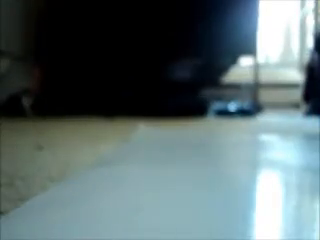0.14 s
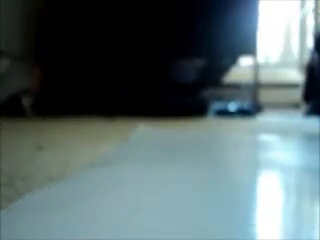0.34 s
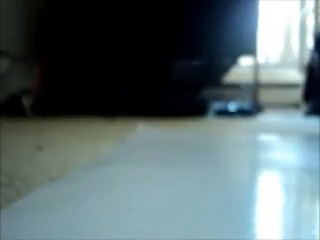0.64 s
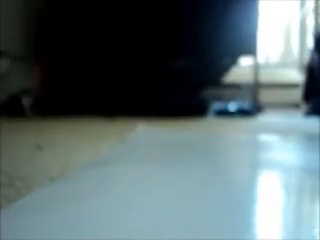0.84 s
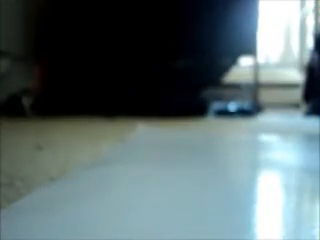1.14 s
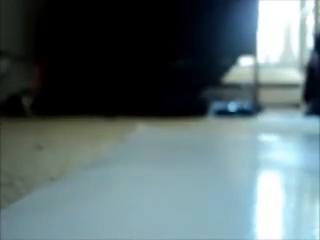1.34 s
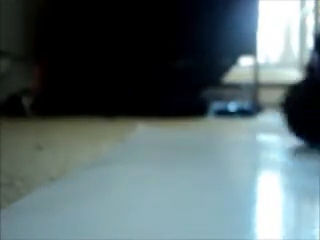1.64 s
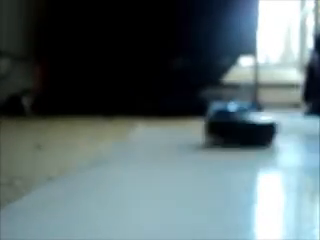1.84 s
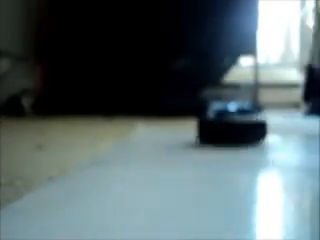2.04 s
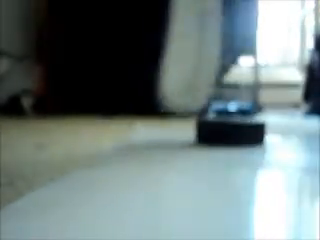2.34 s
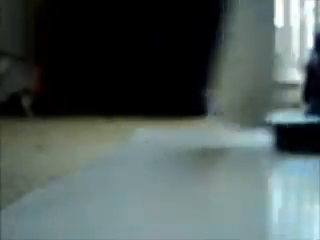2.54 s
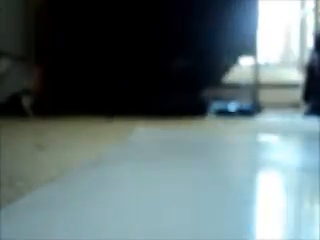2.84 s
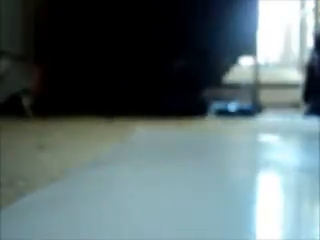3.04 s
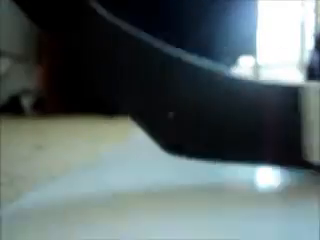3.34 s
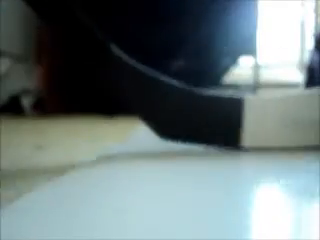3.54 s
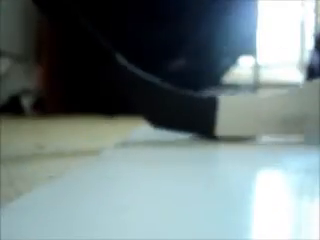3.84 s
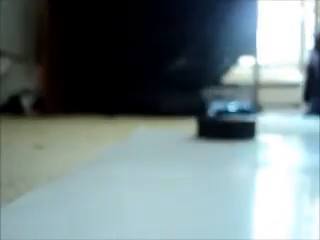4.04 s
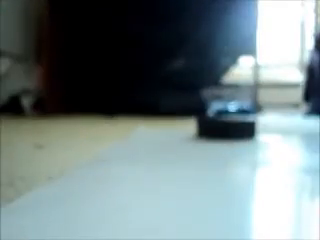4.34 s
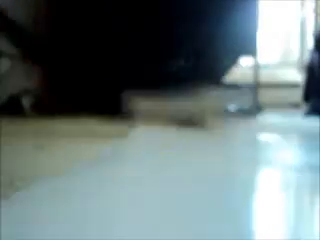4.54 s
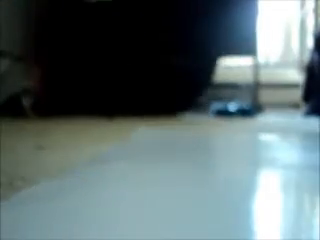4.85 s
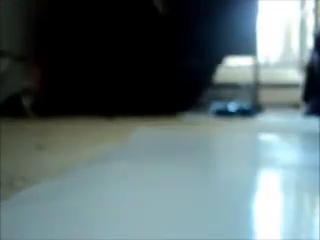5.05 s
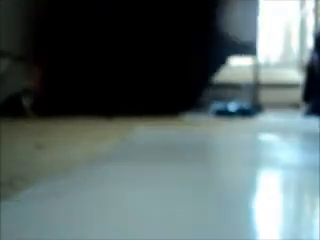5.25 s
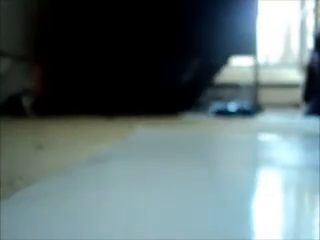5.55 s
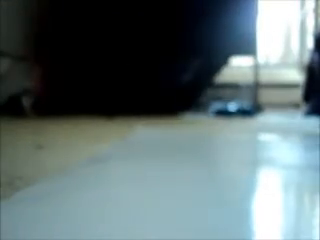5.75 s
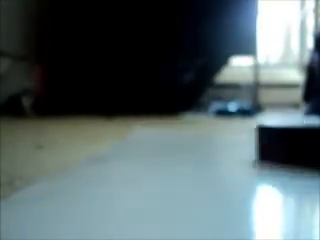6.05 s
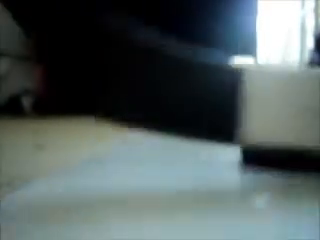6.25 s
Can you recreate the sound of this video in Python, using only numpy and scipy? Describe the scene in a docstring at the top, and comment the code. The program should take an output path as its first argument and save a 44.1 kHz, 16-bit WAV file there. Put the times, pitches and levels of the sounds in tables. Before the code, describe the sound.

Stick clacks and dull thuds on a hard sheet, a puck rocking flat, short slides, then one clipping shot crack and quieter aftermath in a small room.

```python
"""Hockey practice in a small room: impacts are short force pulses that excite decaying modes and echoes.
The room noise first swells as the gain recovers; stick clacks and thuds follow, a puck hops in and falls over.
It rocks flat in quickening double knocks, then thuds, clacks and slides (filtered noise) lead to one hard shot.
The shot overloads the recorder: the gain sinks, a faint ping (one decaying sine) sounds, the room noise starts
to swell in again, a small pop is heard, and after another clack and more slides the next puck is stopped."""
import sys
import numpy as np
from scipy import signal
from scipy.fft import rfft, irfft, next_fast_len
from scipy.io import wavfile

SR = 44100
rng = np.random.default_rng(int(sys.argv[2]) if len(sys.argv) > 2 else 0)


def transcribe(signal):
    """Save signal, clipped to [-1, 1], as a 16-bit WAV file at the path in sys.argv[1]."""
    frames = np.atleast_2d(signal).T
    limited = np.clip(frames, -1, 1)
    pcm = np.round(limited * 32767).astype(np.int16)
    wavfile.write(sys.argv[1], SR, pcm)


N = 282681
TIME = np.arange(N) / SR
RING = TIME[:SR // 2]  # time axis of one blow, half a second

# Clacks that ring the stick's blade; the row with by far the highest peak is the shot, right by the microphone,
# and the blade's clatter follows it. Each row: middle of the contact in seconds, peak of its push in dB,
# time from middle to peak in ms, then grit, blade ring and room response in dB relative to the clack.
STICK_CLACKS = [(0.2185, -13, 0.23, -20.5, -2, 1.5), (0.2697, -31, 0.2, -15, 13, 15),
                (0.582, -15, 0.24, -22, -4.5, -1), (1.3878, -11.5, 0.19, -11, -0.5, -0.5),
                (1.8652, -17.5, 0.28, -19.5, -8, -4.5), (2.903, -5, 0.2, -25, -40, -2),
                (4.5688, 15, 0.16, -42.5, -23, -21), (4.5793, -10, 0.32, -21.5, -11.5, 1.5),
                (4.5891, -22, .16, 1, -7.5, 0.5), (4.596, -15, 0.16, -22, -12, -1),
                (5.7615, -22, 0.28, -18, -18, 3)]
# Puck or blade landing flat on the sheet: stick work further off, the puck falling over, the blade pushing it off
# and coming down, a new puck laid out, and the next puck stopped. Each row: middle of the contact in seconds,
# peak of its push in dB, grit and sheet ring in dB relative to the thud, frequency the spot favours in Hz.
FLAT_THUDS = [ (0.3375, -16.5, -9, 3.5, 354), (0.3577, -26.5, -2, 12, 340), (.412, -21.5, -10.5, 4, 324),
              (0.5061, -37, -10, 4, 320), (0.8588, -21.5, -12, 9.5, 345), (0.9797, -25.5, -11, 9.5, 198),
              (1.895, -17, -17, 13, 190), (1.8998, -22.5, -5, -18, 200), (2.4358, -29, -16, -6, 230),
              (2.439, -27, -15, 22.5, 235), (3.085, -27.5, -19, -2, 355), (3.3332, -7.5, -28.5, 7.5, 360),
              (3.9724, -25, -12.5, 9.5, 350), (4.0122, -29.5, -16, -14, 400), (6.2946, -8.5, -25.5, 5, 330),
              (6.3121, -21, -21, 8.5, 137)]
# The puck hopping in on its edge. Each row: middle of the contact in seconds, peak of its push in dB
# before the rim's bass loss.
PUCK_HOPS = [(1.547, -32.5), (1.593, -32.5), (1.8074, -31)]
# Slides over the sheet. Each row: start in seconds, length in seconds, rumble and hiss in dB (rms at full speed,
# before the roughness), hiss centre in Hz.
SHEET_SLIDES = [(2.466, 0.27, -54, -61, 4670), (3.36, 0.73, -51.5, -56.5, 960),
                (4.025, 0.24, -59, -48.5, 990), (4.538, 0.11, -54, -75, 3020),
                (5.789, 0.32, -85, -52, 3070), (5.72, 0.59, -48, -59.5, 4570), (6.301, 0.2, -49, -63, 4500)]
# Modes of the blade. Each row: mean frequency in Hz, relative level in dB, 60 dB decay time in seconds.
BLADE_MODES = [(762, -5, 0.047), (910, -25, 0.52), (1032, -10, .08), (1202, -22.5, 0.09), (2620, -11, 0.15),
               (2870, 6, .04)]
# Modes of the sheet on the floor. Each row: mean frequency in Hz, relative level in dB before the weighting by
# the struck spot, 60 dB decay time in seconds.
SHEET_MODES = [(135, -12.5, 0.1), (196, -10, 0.14), (235, -8.5, 0.071), (355, -12, 0.07),
               (427, -7.5, 0.033), (537, -4, 0.028)]
# A faint ping after the shot. Its values: start in seconds, level in dB, mean frequency in Hz,
# 60 dB decay time in seconds.
FAINT_PING = (5.018, -32.5, 997, 0.05)
# Early echoes from things close by. Each row: mean delay in ms, gain relative to the room response.
NEAR_ECHOES = [(1.0, 0.19), (3.9, 0.082), (4.9, 0.085), (7.4, 0.089)]
# Spectrum of the room's scatter and tail. Each row: frequency in Hz, relative density in dB.
ROOM_SPECTRUM = [(60, -10), (140, 2.5), (200, 6.5), (450, 0.5), (700, -1.5), (1050, 3.5), (1450, -3),
                 (2100, -4.5), (2700, 7), (3400, 1.5), (5500, -5)]
# Spectrum of crushed dirt and fine friction. Each row: frequency in Hz, relative density in dB.
GRIT_SPECTRUM = [(300, -11.5), (1200, 8.5), (2200, -8), (2900, 1), (3800, -5.5), (5000, 1.5), (6000, -14)]
# Spectrum of the rumble under a slide. Each row: frequency in Hz, relative density in dB.
RUB_SPECTRUM = [(60, -4), (250, 2.5), (600, 4), (1100, 1.5), (1600, -10.5), (2400, -21), (5500, -25.5)]
# Spectrum of the steady background. Each row: frequency in Hz, relative density in dB.
AMBIENCE_SPECTRUM = [(15, -41), (25, -9), (33, -1.5), (70, -0.5), (144, -2), (317, -4), (372, -5),
                     (545, -7), (596, -8.5), (652, -8.5), (1120, -10.5), (1500, -14.5), (4310, -20.5),
                     (5050, -19.5), (5400, -29), (7020, -60.5), (11900, -120)]

LEAD_S = 0.004  # a contact starts to build up this long before its middle
MIDDLING_DB = -20  # a blow of middling strength, the reference for the thuds
# A middling thud: its width shrinks with force by a power law; its room level lags, as louder thuds are nearer.
THUD_WIDTH_MS, THUD_STIFFENING, THUD_ROOM_DB, THUD_ROOM_LAG = 0.32, 0.05, -1.5, 0.39
# The puck's rim gives one dead knock and radiates little bass.
RIM_HZ, RIM_T60_S, RIM_LOW_HZ = 487, 0.0058, 254
HOP_WIDTH_MS, HOP_GRIT_DB, HOP_RING_DB, HOP_ROOM_DB = 0.32, -24, -23, -6
# The wobble: first landing and first gap in seconds, ratio of successive gaps, first peak and its rise per rock.
WOBBLE_S, WOBBLE_GAP_S, WOBBLE_SHRINK = 2.0085, 0.0662, 0.846
WOBBLE_DB, WOBBLE_GROWTH_DB = -24.5, 1.5
TOUCH_AHEAD_S, TOUCH_DB = 0.009, -6  # in each rock the rim touches lightly just before it lands
ROCK_WIDTH_MS, ROCK_GRIT_DB, ROCK_RING_DB, ROCK_ROOM_DB = 0.32, -13.5, -25.5, -1
SLIDE_RISE = 0.26  # share of a slide's length spent gathering speed
ROOM_T60_S, ROOM_TREBLE_T60_S = 0.3, 0.26
AMBIENCE_DB = -52  # rms before the low part wavers
# Gain after an overload (threshold in full scale): it sinks, stays down, then creeps back.
OVERLOAD, HOLD_S = 0.85, 0.6892
DUCK_DB, DUCK_ATTACK_S, DUCK_STAY_S, DUCK_RELEASE_S = -11.5, 0.27, 0.52, 0.45
BAND_HZ, TOP_HZ = 5430, 16000  # edges of the two low-passes


def clacks():
    """Modal excitation: a short contact on the stick's blade sets its modes ringing."""
    out = np.zeros(N)
    for s, db, width_ms, grit_db, blade_db, room_db in STICK_CLACKS:
        response = undb(blade_db) * ring(BLADE_MODES, db=-34.5) + undb(room_db) * room()
        contact = push(width_ms) + undb(grit_db) * grit()
        add(out, undb(db) * blow(contact, response), s - LEAD_S)
    return out


def thuds(octave_db=12):
    """Selective excitation: a flat landing rings mostly the sheet modes that the struck spot favours."""
    out = np.zeros(N)
    for s, db, grit_db, sheet_db, spot_hz in FLAT_THUDS:
        force_db = db - MIDDLING_DB
        width_ms = THUD_WIDTH_MS * undb(-THUD_STIFFENING * force_db)
        room_db = THUD_ROOM_DB - THUD_ROOM_LAG * force_db
        # a mode weakens with its distance in octaves from the favoured frequency
        modes = [(hz, d - octave_db * abs(np.log2(hz / spot_hz)), t60) for hz, d, t60 in SHEET_MODES]
        response = undb(sheet_db) * ring(modes, db=-40) + undb(room_db) * room()
        contact = push(width_ms) + undb(grit_db) * grit()
        add(out, undb(db) * blow(contact, response), s - LEAD_S)
    return out


def blow(contact, response):
    """Linear superposition: the direct sound of a contact plus its convolution with all that it sets ringing."""
    return contact + signal.fftconvolve(contact, response)[:len(RING)]


def push(width_ms):
    """A contact radiates the slope of its force pulse; a longer contact sounds duller."""
    u = (RING - LEAD_S) / (width_ms / 1000)
    return -u * np.exp((1 - u ** 2) / 2)  # peak of 1


def grit(rise_s=0.0009, t60=0.013, db=-8, edge_ms=0.06, edge_db=-2, ahead_ms=0.35):
    """Brief contacts are bright: the hard edge ticks as it first touches, then crushes dirt in a short crackle."""
    since = RING - LEAD_S
    shape = np.exp(np.minimum(since / rise_s, -np.log(1000) * since / t60))
    crackle = shape * noise(GRIT_SPECTRUM, len(RING))
    tick = np.interp(RING + ahead_ms / 1000, RING, push(edge_ms))  # slightly ahead of the push
    return undb(edge_db) * tick + undb(db) * crackle


def ring(modes, db, scatter=0.0042):
    """Modal superposition: a struck body answers in decaying sines that shift a little from blow to blow."""
    out = np.zeros(len(RING))
    for hz, mode_db, t60 in modes:
        shifted_hz = hz * (1 + scatter * rng.standard_normal())
        out += undb(mode_db) * fade(t60) * np.sin(2 * np.pi * shifted_hz * RING)
    return undb(db) * out


def puck(count=4):
    """A settling disc: the puck hops in on its edge, then rocks flat in ever sooner and harder double knocks."""
    out = np.zeros(N)
    for s, db in PUCK_HOPS:
        knock = rim_knock(HOP_WIDTH_MS, HOP_GRIT_DB, HOP_RING_DB, HOP_ROOM_DB)
        add(out, undb(db) * knock, s - LEAD_S)
    lands = WOBBLE_S
    for k in range(count):
        landing_db = WOBBLE_DB + k * WOBBLE_GROWTH_DB
        touch = (lands - TOUCH_AHEAD_S, landing_db + TOUCH_DB)
        for s, db in (touch, (lands, landing_db)):
            knock = rim_knock(ROCK_WIDTH_MS, ROCK_GRIT_DB, ROCK_RING_DB, ROCK_ROOM_DB)
            add(out, undb(db) * knock, s - LEAD_S)
        lands += WOBBLE_GAP_S * WOBBLE_SHRINK ** k
    return out


def rim_knock(width_ms, grit_db, ring_db, room_db):
    """A small radiator loses bass: the rim's push is high-passed and excites one heavily damped mode."""
    contact = butter(push(width_ms), RIM_LOW_HZ, "high", order=1) + undb(grit_db) * grit()
    knock = ring([(RIM_HZ, 0, RIM_T60_S)], ring_db, scatter=0.091)
    return blow(contact, knock + undb(room_db) * room())


def slides(rough_db=2, hiss_q=3):
    """Friction noise follows speed: puck or blade on plastic gives uneven rumble and a band of fine hiss."""
    out = np.zeros(N)
    rumble = noise(RUB_SPECTRUM, N)
    fine = noise(GRIT_SPECTRUM, N)
    for start, length, rumble_db, hiss_db, hiss_hz in SHEET_SLIDES:
        # it gathers speed, then coasts to rest
        speed = np.interp((TIME - start) / length, [0, SLIDE_RISE, 1], [0, 1, 0])
        hiss = signal.lfilter(*signal.iirpeak(hiss_hz, hiss_q, fs=SR), fine)
        hiss /= hiss.std()
        out += speed ** 0.98 * (undb(rumble_db) * rumble + undb(hiss_db) * hiss)
    return out * undb(rough_db * walk(130))


def ping(swell_s=0.0058):
    """A single damped resonance with a soft onset: something small rings faintly."""
    s, db, hz, t60 = FAINT_PING
    out = np.zeros(N)
    add(out, ring([(hz, 0, t60)], db) * (1 - np.exp(-RING / swell_s)), s)
    return out


def room(early_db=-36, early_t60=0.13, late_db=-41, build_s=0.0048, split_hz=1800, spread=0.032):
    """Reverberation: a few near echoes, a quick scatter off floor and furniture, then a short tail."""
    early = noise(ROOM_SPECTRUM, len(RING)) * fade(early_t60)
    late = noise(ROOM_SPECTRUM, len(RING))
    low = butter(late, split_hz, "low", order=1)
    tail = low * fade(ROOM_T60_S) + (late - low) * fade(ROOM_TREBLE_T60_S)
    build_up = 1 - np.exp(-(RING / build_s) ** 2)
    out = build_up * (undb(early_db) * early + undb(late_db) * tail)
    for delay_ms, gain in NEAR_ECHOES:
        shifted_ms = abs(delay_ms * (1 + spread * rng.standard_normal()))
        out[int(shifted_ms * SR / 1000)] += gain
    return out


def ambience(waver_db=-3.0, split_hz=700):
    """Stationary noise with a modulated low band: room rumble that wavers a little, under smooth hiss."""
    air = noise(AMBIENCE_SPECTRUM, N)
    low = butter(air, split_hz, "low")
    waver = undb(waver_db * walk(36))
    return undb(AMBIENCE_DB) * (air + low * (waver - 1))


def undb(db):
    """The decibel is logarithmic: 20 dB is a tenfold amplitude gain."""
    return 10 ** (np.asarray(db) / 20)


def noise(colour, size):
    """Spectral shaping: white noise weighted by (Hz, dB) points and scaled to rms 1."""
    hz, db = np.transpose(colour)
    padded = next_fast_len(size)
    bins = np.maximum(np.fft.rfftfreq(padded, 1 / SR), 1)
    gain = undb(np.interp(np.log(bins), np.log(hz), db))
    y = irfft(rfft(rng.standard_normal(padded)) * gain, padded)[:size]
    return y / y.std()


def butter(x, hz, kind, order=2):
    """Maximally flat filtering: a Butterworth low-pass or high-pass."""
    return signal.sosfilt(signal.butter(order, hz, kind, fs=SR, output="sos"), x)


def fade(t60):
    """Exponential damping: the amplitude falls by 60 dB in t60 seconds."""
    return np.exp(-np.log(1000) * RING / t60)


def walk(rate):
    """Slow random modulation: random knots, rate of them per second, joined by straight lines."""
    knots = np.arange(0, TIME[-1] + 1, 1 / rate)
    return np.interp(TIME, knots, rng.standard_normal(len(knots)))


def add(out, x, start_s):
    """Superposition: mix x into out from a given time on."""
    i = int(round(start_s * SR))
    out[i:i + len(x)] += x[:len(out) - i]


def scene():
    """Pressures add: knocks, the shot, the settling puck and slides over the quiet room, in mono."""
    return (clacks() + thuds() + puck() + slides() + ping() + ambience())[None]


def gain_control(x, pop_db=-32.0, settle_hz=0.29, sink_s=0.012):
    """Automatic gain: an overload ducks it; the stage's bias shifts while it holds and pops when it lets go."""
    # time of the latest overload; it starts out still recovering
    last = np.maximum.accumulate(np.where(abs(x) > OVERLOAD, TIME, -HOLD_S))
    age = TIME - last
    held = age < HOLD_S
    bias = butter(-(held * np.minimum(age / sink_s, 1)), settle_hz, "high", order=1)
    sink = np.minimum(age / DUCK_ATTACK_S, 1)
    release = np.exp(-np.maximum(age - DUCK_STAY_S, 0) / DUCK_RELEASE_S)
    return x * undb(DUCK_DB * sink * release) + undb(pop_db) * bias


def record(dry):
    """Saturation and band limiting: a narrow-band microphone with gain control; the hardest crack clips."""
    x = np.clip(gain_control(dry[0]), -0.95, 0.95)
    x = signal.sosfiltfilt(signal.butter(16, BAND_HZ, fs=SR, output="sos"), x)
    top = signal.ellip(8, 0.1, 70, TOP_HZ, fs=SR, output="sos")
    return signal.sosfilt(top, np.clip(x, -1, 1))[None]


dry = scene()
out = record(dry)
transcribe(out)
```